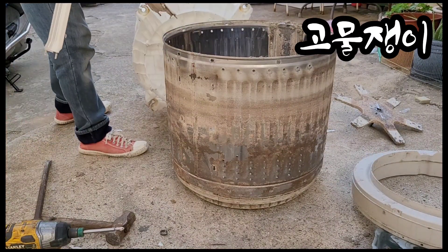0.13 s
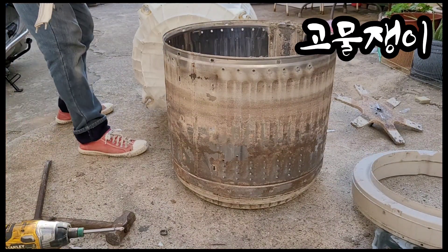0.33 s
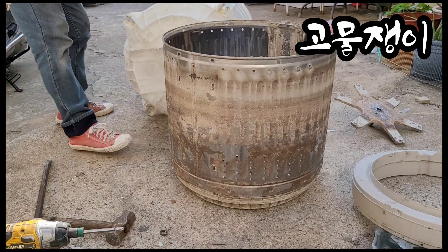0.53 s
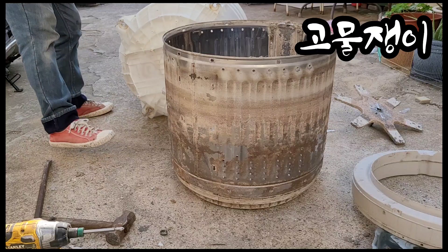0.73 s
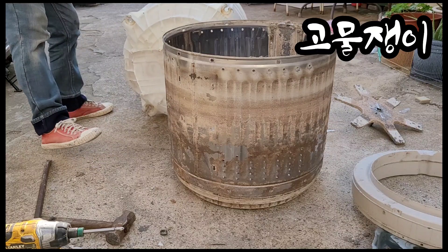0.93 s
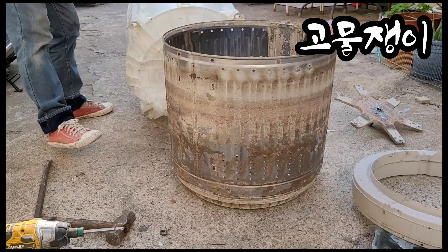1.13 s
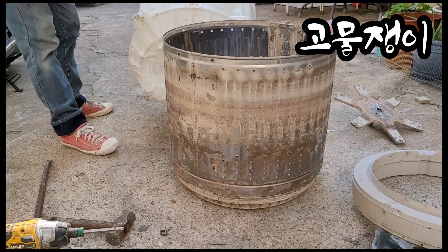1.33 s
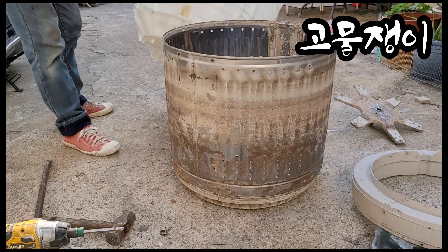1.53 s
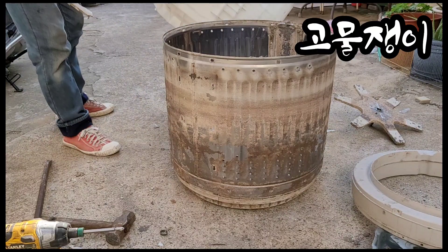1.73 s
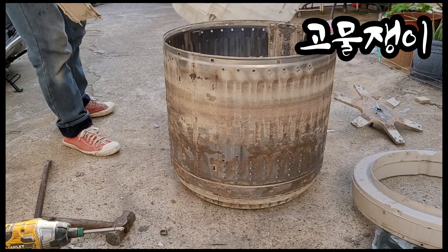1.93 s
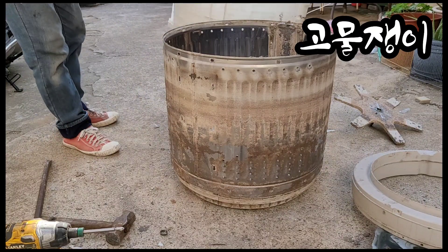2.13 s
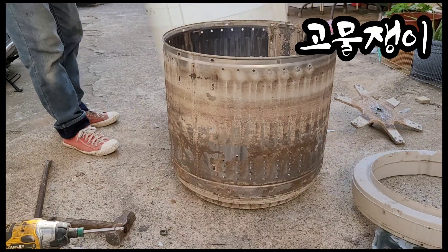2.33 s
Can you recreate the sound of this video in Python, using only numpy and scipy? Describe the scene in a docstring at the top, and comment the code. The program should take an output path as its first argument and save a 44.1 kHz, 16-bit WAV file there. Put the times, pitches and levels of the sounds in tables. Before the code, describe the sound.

A big hollow metal drum clangs, bounces and rolls, scraping on concrete outdoors.

```python
"""A big hollow drum is knocked about on a concrete yard, a little left of a stereo microphone pair.
It scrapes, takes one heavy blow, bounces, then rolls on, rubbing and knocking on the ground.
Each contact of the rim sets off a short clangy ring in the shell, and the hollow body hums on.
Low thumps come from its booming walls and from a footfall. Under it all lie a rolling rumble,
wind or handling noise on the microphones in the lowest bass, and the quiet air of the yard."""
import sys
import numpy as np
from scipy import signal
from scipy.fft import rfft, irfft
from scipy.io import wavfile

SR = 44100
rng = np.random.default_rng(int(sys.argv[2]) if len(sys.argv) > 2 else 0)


def output_pcm(signal):
    """Save a mono or channel-first signal as 16-bit PCM at the path in sys.argv[1].

    Samples are clipped to [-1, 1] before scaling.
    """
    pcm = np.clip(np.atleast_2d(signal).T, -1, 1) * 32767
    wavfile.write(sys.argv[1], SR, np.round(pcm).astype(np.int16))


N = 105840
TIME = np.arange(N) / SR


def amp(db):
    """Decibels to gain."""
    return 10 ** (np.asarray(db) / 20)


def unit(x):
    """Scales to rms 1."""
    return x / np.sqrt(np.mean(x ** 2) + 1e-20)


def curve(points, hz):
    """Reads a table on a log-frequency axis."""
    f, value = np.transpose(points)
    return np.interp(np.log(hz + 1), np.log(f + 1), value)


def add(mix, start, sound):
    """Adds a stereo sound at a start in seconds."""
    part = mix[:, max(round(start * SR), 0):][:, :sound.shape[1]]
    part += sound[:, :part.shape[1]]


def mic_pair(z, likeness):
    """Makes two unrelated signals partly alike, as at the left and right microphones."""
    return np.array([z[0], likeness * z[0] + np.sqrt(1 - likeness ** 2) * z[1]])


def noise(tone, likeness):
    """Steady stereo noise with a given spectrum."""
    white = mic_pair(rfft(rng.standard_normal((2, N))), likeness)
    return unit(irfft(white * amp(curve(tone, np.fft.rfftfreq(N, 1 / SR))), N))


def drift(rate_hz):
    """A random wander of level and phase for each channel."""
    hz = np.fft.fftfreq(N, 1 / SR)
    white = rng.standard_normal((2, N)) + 1j * rng.standard_normal((2, N))
    wander = np.fft.ifft(np.fft.fft(white) * np.exp(-(hz / rate_hz) ** 2))
    return wander / np.std(wander)


# The air of the yard. Each row: frequency in Hz, relative level in dB.
YARD_TONE = [(20, 1), (100, -1.5), (300, -7), (700, -5), (1200, -15.5), (3000, -27.5), (6000, -34.5),
             (15000, -35)]

def yard_air():
    """A faint, low wash all around the microphones."""
    return amp(-59) * noise(YARD_TONE, likeness=0.067)


# The low rumble at the microphones. Each row: frequency in Hz, relative level in dB.
RUMBLE_TONE = [(15, -14), (45, 3), (85, 3.5), (130, -9), (200, -15), (400, -24.5), (1000, -70)]
# Wind or handling noise leaves the lowest bass almost unrelated between the microphones.
# Each row: frequency in Hz, left-right likeness from 0 to 1.
RUMBLE_LIKENESS = [(25, 0.05), (60, 0.37)]
# The rumble's rise and fall. Each row: time in seconds, level in dB.
RUMBLE_LEVEL = [(0, -45), (.13, -52.5), (0.299, -34.5), (0.761, -30.5), (.92, -48), (1.151, -39),
                (1.48, -39), (1.56, -43), (2.02, -43.5), (2.15, -52), (2.299, -52), (2.38, -31.5)]

def rumble():
    """A deep rolling rumble, with wind or handling noise on the microphones in the lowest bass."""
    likeness = curve(RUMBLE_LIKENESS, np.fft.rfftfreq(N, 1 / SR))
    return noise(RUMBLE_TONE, likeness) * amp(np.interp(TIME, *np.transpose(RUMBLE_LEVEL)))


# Faint squeaks of the rim. Each row: start and length in seconds, level in dB, pitch in Hz,
# glide in octaves, width in Hz.
RIM_SQUEAKS = [(0.127, 0.042, -53, 4100, -0.062, 400), (0.149, 0.054, -47, 1616, -0.2, 262),
               (0.951, 0.147, -53.5, 856, -0.14, 30), (1.559, 0.09, -50.5, 3194, 0.062, 240)]

def squeak(start, length, db, hz, glide, width_hz):
    """A thin gliding tone where the rim drags."""
    progress = np.clip((TIME - start) / length, 0, 1)
    tone = np.exp(2j * np.pi * np.cumsum(hz * 2 ** (glide * progress)) / SR)
    return amp(db) * np.sin(np.pi * np.sqrt(progress)) * unit((drift(width_hz) * tone).real)


# Modes of the hollow body. Each row: pitch in Hz, relative level in dB, seconds to fall 60 dB.
HUM_MODES = [(159, -24, 0.95), (257.6, -29, 1.23), (291.2, -30.5, 1.77), (303, -39.5, 1.2),
             (403, -38, 1.85)]
# Jolts that set them off. Each row: start in seconds, strength in dB, favoured pitch in Hz.
HUM_JOLTS = [(0.211, -2, 266), (.5, -5.5, 258), (.657, 0, 203.6), (.96, -14, 241), (1.774, -16, 377)]

def hum(favour_octaves=0.66, detune=0.02023, waver_depth=1.14):
    """The hollow body sings on after each jolt, wavering as it turns."""
    out = np.zeros((2, N))
    for hz, db, t60 in HUM_MODES:
        ring = 0
        for start, strength_db, favoured_hz in HUM_JOLTS:
            t = np.maximum(TIME - start, 0)
            pitch = hz * (1 + detune * rng.uniform(-1, 1))
            share = np.exp(-(np.log2(hz / favoured_hz) / favour_octaves) ** 2)
            envelope = np.minimum(t / 0.016, 1) * amp(strength_db + db - 60 * t / t60)
            ring += share * envelope * np.exp(2j * np.pi * pitch * t)
        out += (ring * (1 + waver_depth * drift(rate_hz=27.6))).real
    return out


# Low thumps in the yard; the one at 1.494 s is a footfall.
# Each row: crest time in seconds, level in dB, pitch in Hz, swell and fade in seconds.
LOW_THUMPS = [(0.159, -32.5, 146, .012, 0.017), (.198, -17.5, 122, 0.0047, .0068),
              (0.2112, -21, 115, 0.0086, .0097), (0.27, -18.5, 70, .004, 0.0077),
              (0.2812, -3.5, 130.5, .0035, 0.009), (0.3467, -11.5, 156.1, 0.036, 0.034),
              (.386, -15, 112.4, 0.015, 0.02), (.449, -9, 110, 0.0054, 0.0095),
              (.573, -10, 106.6, 0.0057, 0.014), (.58, -7.5, 133, 0.0026, 0.013),
              (0.608, -13.5, 116, 0.0084, 0.0087), (0.656, -3.5, 130, 0.0052, .0065),
              (.704, -16, 141, 0.0093, 0.011), (0.742, -24.5, 119.4, 0.016, 0.043),
              (1.253, -33, 77, 0.024, 0.017), (1.463, -24.5, 63, 0.0078, 0.016),
              (1.494, -27.5, 130, 0.0029, 0.0058), (1.668, -36.5, 79, 0.0095, 0.0073),
              (1.784, -28, 70, 0.0032, 0.003), (1.943, -26, 44, 0.0048, .018),
              (1.995, -28.5, 51, 0.0065, 0.007)]

def thumps():
    """Short low thumps: the drum's walls booming at each bounce, and a footfall."""
    out = np.zeros(N)
    for crest, db, hz, swell, fade in LOW_THUMPS:
        t = TIME - crest
        envelope = np.exp(-(t / np.where(t < 0, swell, fade)) ** 2 / 2)
        out -= amp(db) * envelope * np.cos(2 * np.pi * hz * t)
    return out


# The shell's dense ring. Each row: frequency in Hz, seconds to fall 60 dB.
RING_DECAY = [(100, 1), (300, 0.46), (800, 0.31), (2000, 0.36), (5000, 0.32), (15000, 0.36)]
# Its clear modes. Each row: pitch in Hz, relative level in dB, seconds to fall 60 dB.
SHELL_MODES = [(362.1, -5, 0.31), (446, -6, 0.22), (572.7, -2.5, 0.12), (701, -13, 0.19),
               (751, -11.5, 0.49), (990, -15.5, 0.096), (1175, 1, 0.087), (1299, -1.5, 0.13),
               (1421, -7, 0.32), (1643, -10, 0.37), (2097, -3, 0.14), (2520, -7, 0.072),
               (3290, -12.5, 0.17), (5050, -3, .09)]

def shell(ring_db, modes_db, size=32768):
    """The drum struck at one spot: direct sound, a dense dying ring and the clear modes."""
    t = np.arange(size) / SR
    white = mic_pair(rng.choice([-1., 1.], (2, size)), likeness=0.076)
    hz, age, bands = signal.stft(white, SR, nperseg=256)
    decay = amp(-60 * age / curve(RING_DECAY, hz)[:, None])
    ring = signal.istft(bands * decay, SR, nperseg=256)[1][:, :size]
    out = amp(ring_db) * unit(ring) / np.sqrt(size)
    for pitch, db, t60 in SHELL_MODES:
        phase = np.pi * (rng.random((2, 1)) - 0.5)
        out += amp(modes_db + db - 48 - 60 * t / t60) * np.cos(2 * np.pi * pitch * t + phase)
    out[:, 0] += 1  # the direct sound
    return out


def through_drum(force, tone, lifts, drum, size=2048):
    """A contact force, coloured by its tone and band lifts (Hz, dB), drives the drum."""
    hz = abs(np.fft.fftfreq(size, 1 / SR))
    log_gain = np.log(unit(amp(curve(tone, hz))) * amp(curve(lifts, hz)))
    contact = np.fft.ifft(np.exp(np.conj(signal.hilbert(log_gain)))).real[None]  # minimum phase
    return signal.fftconvolve(signal.fftconvolve(force, contact, axes=1), drum, axes=1)


CONTACT_LIKENESS = 0.53  # between the two microphones
# The tone of the rim dragged on concrete. Each row: frequency in Hz, relative level in dB.
SCRAPE_SPECTRUM = [(60, -7.5), (250, 4.5), (550, 3.5), (850, -1.5), (1300, -6.5), (1600, -21),
                   (2200, -20.5), (3300, -24), (4300, -33.5), (6500, -34.5), (9000, -32), (15000, -38.5)]
# Scrapes across the yard. Each row: start and length in seconds, first and last level in dB,
# then lifts of depth, brightness and grit in dB.
RIM_SCRAPES = [(0, 0.18, -59, -64, 7.5, 12.5, 13), (0.131, 0.22, -52.5, -38.5, 11, 14, 3),
               (.219, 0.04, -20.5, -20.5, -9.5, 1.5, -2.5), (0.496, 0.066, -30.5, -32, 2, 1.5, -0.5),
               (0.588, .12, -42, -43.5, 10.5, 13, 8), (1.135, 0.14, -52, -42, -21.5, 8, 1.5),
               (1.302, 0.094, -41, -54, -42, 0.5, -3.5), (1.462, 0.095, -61, -65.5, 4.5, 13.5, 17.5),
               (1.532, 0.093, -45, -36, -10.5, 8, 9.5), (1.609, 0.059, -54, -44, -5.5, 4, -2),
               (2.151, .22, -69.5, -72.5, 6, 11, 14.5)]

def scrape(length, first_db, last_db, depth_db, bright_db, grit_db, size=8192):
    """The rim sticks and slips on grains of concrete."""
    slips_per_s, spread_db = 3000, 3.5
    t = np.arange(size) / SR
    slips = (rng.random((2, size)) < slips_per_s / SR) * rng.choice([-1, 1], (2, size))
    strength = amp(spread_db * np.minimum(rng.exponential(1, (2, size)), 4))
    pressure = amp(np.interp(t, [0, length], [first_db, last_db]))
    release = np.clip((length - t) / 0.0093, 0, 1)
    force = unit(mic_pair(slips * strength, CONTACT_LIKENESS)) * pressure * release
    lifts = [(330, depth_db), (750, 0.023), (2000, bright_db), (4500, bright_db), (7000, grit_db)]
    return through_drum(force, SCRAPE_SPECTRUM, lifts, shell(ring_db=0.5, modes_db=0))


# The tone of a knock. Each row: frequency in Hz, relative level in dB.
KNOCK_SPECTRUM = [(40, -8.5), (180, -1), (400, 0), (620, 5), (900, -3), (1350, -7.5), (2100, -9.5),
                  (3000, -17.5), (5000, -24), (5700, -31), (8500, -32), (15000, -34.5)]
# Knocks on the shell. Each row: start in seconds, relative level in dB, contact length in seconds,
# then lifts of depth, clang, brightness, grit and the clear modes in dB.
SHELL_KNOCKS = [(0.268, -4.5, 0.0043, -2, -0.5, 5, -3, 6.5), (.27, 3.5, 0.0028, 2.5, -0.5, -5.5, -1.5, 3.5),
                (.274, -7.5, 0.0038, 3.5, 9, 12.5, 4, 5.5), (0.427, -11.5, 0.042, 10, -8, -10, -13, -3),
                (0.5646, -6, 0.0092, 0.5, -1, -15, -6, 5), (0.6, -15.5, 0.004, 4, -12, -9, -5, 14),
                (0.634, -13, 0.011, 6, 6, 0, 6.5, -1), (0.655, -7.5, 0.021, 3, -1.5, 2.5, -4.5, -3),
                (0.81, -23.5, 0.075, 16.5, -9, -9.5, -7, -4), (1.126, -31, 0.012, 10, 2, -20, -17, 5),
                (1.2812, -13.5, 0.0121, -13.5, 2, -15, -7, 7.5), (1.57, -15, .003, -3.5, -16, -6, -12, 6),
                (1.59, -18, 0.0043, -26, 9, -1, 2, 10), (1.601, -20, 0.013, -17.5, 16, 10, 10, 13),
                (1.669, -18.5, 0.033, .5, -4, -1, 0.5, 4.5),
                (1.766, -21, 0.0047, -2, -12.5, -9.5, -2.5, -12),
                (1.774, -18.5, 0.019, -1, -27, -19, -12, -3),
                (2.3744, -15.5, 0.0097, -9.5, -16, -7.5, -9, 22)]

def knock(db, length, depth_db, clang_db, bright_db, grit_db, modes_db, size=4096, softness=0.24):
    """The rim lands with a brief chatter of tiny contacts that drives all modes evenly."""
    progress = np.arange(size) / SR / length
    pressure = unit(progress ** softness * np.exp(-progress ** 2))
    chatter = mic_pair(rng.choice([-1., 1.], (2, size)), CONTACT_LIKENESS) * pressure
    for _ in range(6):  # flatten the spectrum while keeping the contact brief
        even = irfft(np.exp(1j * np.angle(rfft(chatter))))
        chatter = np.clip(unit(even), -2 * pressure, 2 * pressure)
    force = amp(db + 7.5) * unit(chatter) / np.sqrt(size)
    lifts = [(330, depth_db), (800, 0.0074), (1500, clang_db),
             (2000, bright_db), (5000, bright_db), (7000, grit_db)]
    return through_drum(force, KNOCK_SPECTRUM, lifts, shell(ring_db=-2.5, modes_db=modes_db))


def scene():
    """The drum, a little to the left, and a footfall, over the rumble and the quiet yard."""
    lean_left, lean_right, lag_samples = amp([[0.5], [-0.5]]), amp([[-0.5], [0.5]]), 6
    mix = thumps() * lean_right + hum() + sum(squeak(*row) for row in RIM_SQUEAKS)
    for start, *row in SHELL_KNOCKS:
        add(mix, start, knock(*row) * lean_left)
    for start, *row in RIM_SCRAPES:
        add(mix, start, scrape(*row) * lean_left)
    mix[1] = np.pad(mix[1], (lag_samples, 0))[:N]  # the right microphone is slightly farther away
    return mix + rumble() + yard_air()


def record(dry, cutoff_hz=15750):
    """The microphone chain overloads softly on the hardest peaks and cuts the highest treble."""
    rounded = dry / (1 + dry ** 8) ** (1 / 8)
    lowpass = signal.firwin(511, cutoff_hz, window=("kaiser", 9), fs=SR)
    return signal.oaconvolve(rounded, lowpass[None], "same")


dry = scene()
out = record(dry)
output_pcm(out)
```